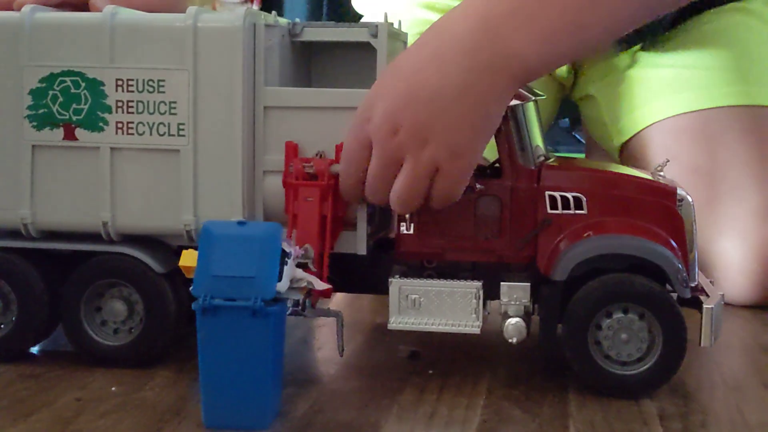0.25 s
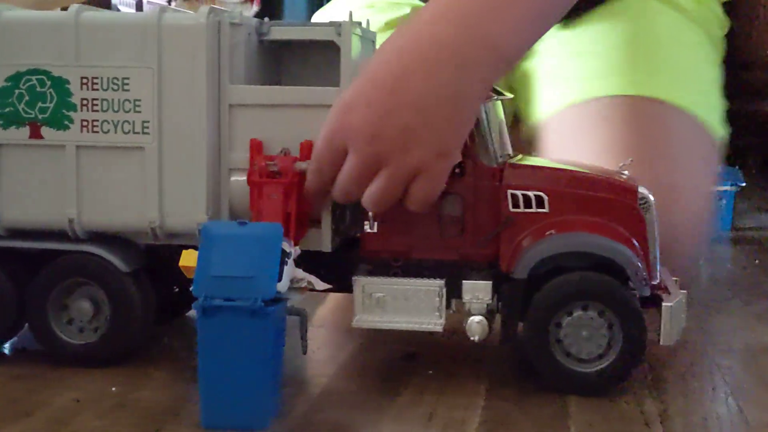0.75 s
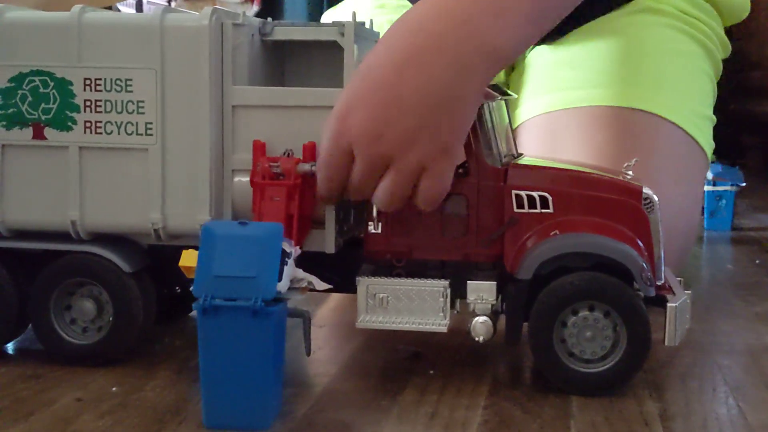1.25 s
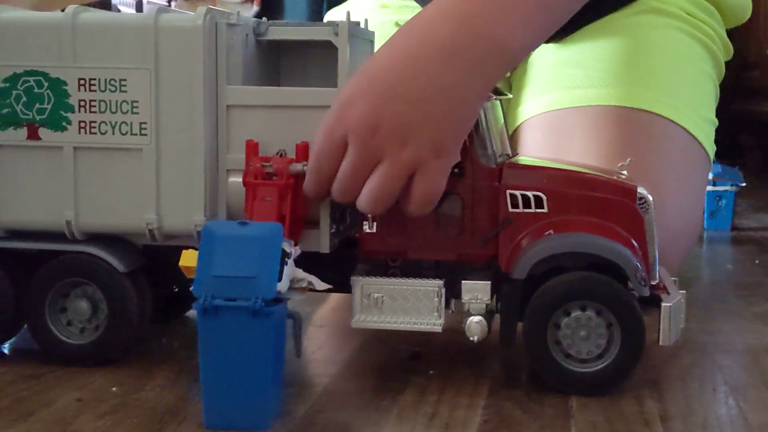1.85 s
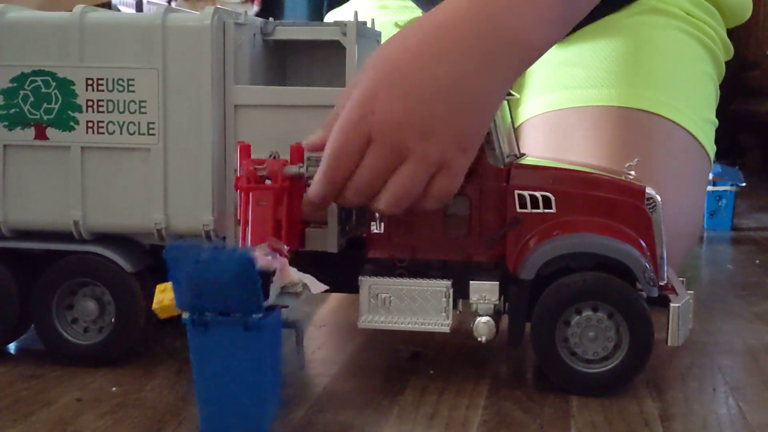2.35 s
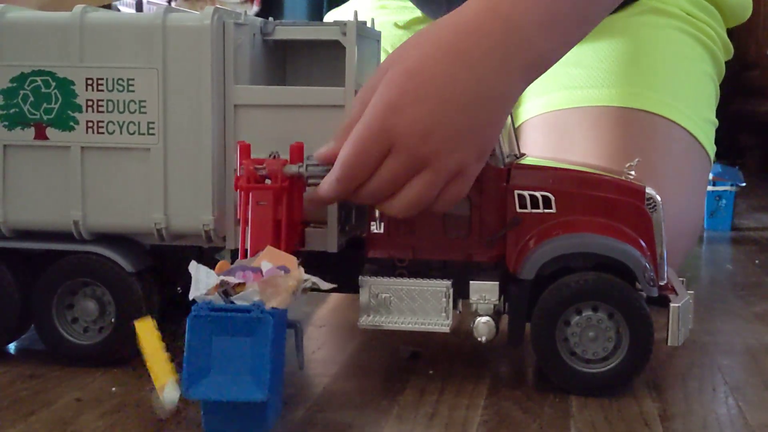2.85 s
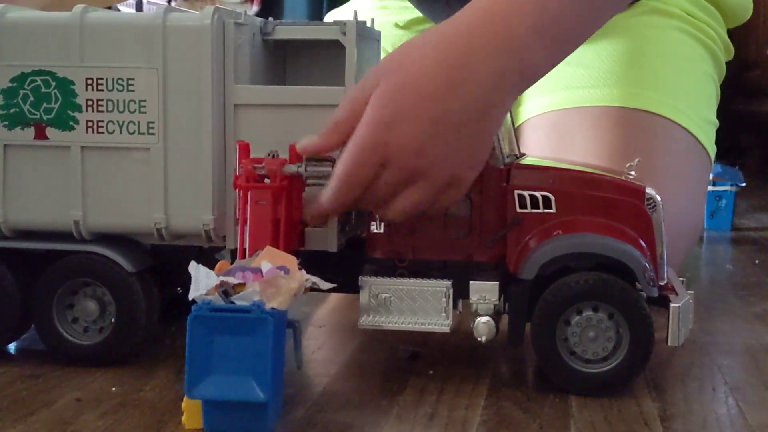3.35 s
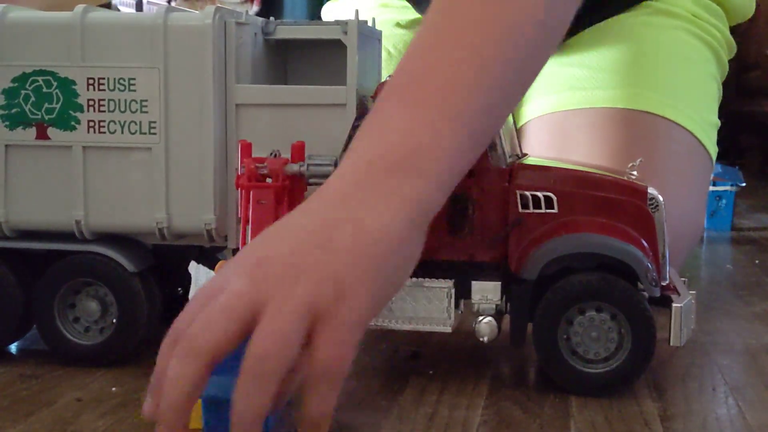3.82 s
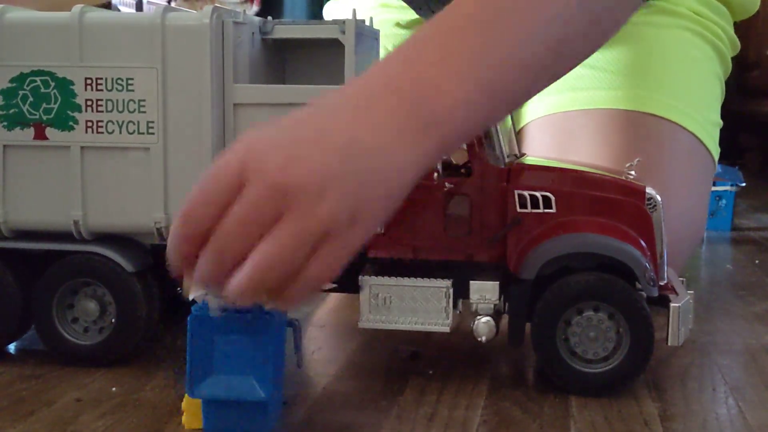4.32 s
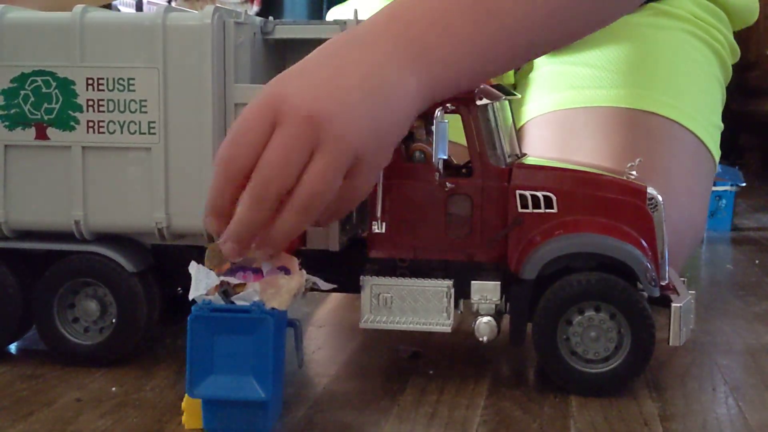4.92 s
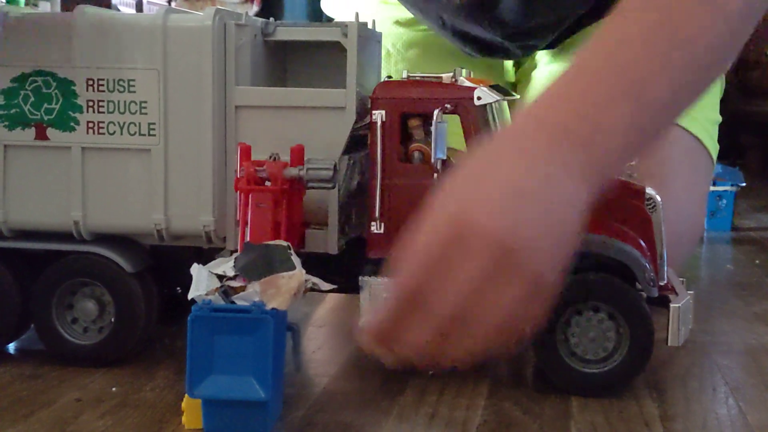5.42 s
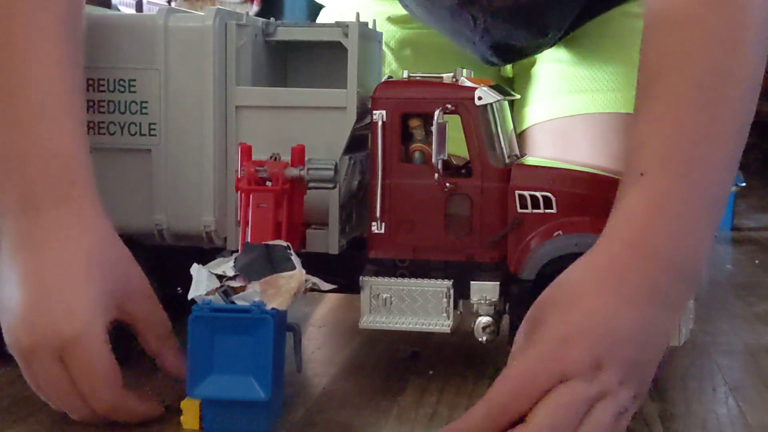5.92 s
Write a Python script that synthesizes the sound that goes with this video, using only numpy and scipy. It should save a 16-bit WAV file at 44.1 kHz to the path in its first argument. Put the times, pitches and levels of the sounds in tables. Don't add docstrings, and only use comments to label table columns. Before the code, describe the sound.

A close stereo pickup in a small quiet room, with soft hiss and low room air. Light hollow plastic clicks open the scene; from 0.5 to 1.1 seconds a cluster of clicks, scrapes and rattles mixes with dull, low thumps of knees and hands on wooden boards. After a near pause, a crisp lever clack lands at 1.55, small ticks follow around 2.0, and a stronger clack at 2.24. The bin tips with a bright hard knock at 2.56, drags and clicks, then its rim slams the floor at 2.88, the loudest moment. A hollow plastic brick hits at 3.01 and bounces rapidly until about 3.18, with bright short pings, and one last knock at 3.33. Quiet follows. At 4.0 to 4.3 a hand thumps softly and foil crackles crisply. Until 6 seconds only faint rustles, tiny ticks and gentle low board bumps remain.

```python
import sys
import numpy as np
from scipy import signal
from scipy.fft import rfft, irfft
from scipy.io import wavfile
from scipy.ndimage import uniform_filter1d

SR = 44100
rng = np.random.default_rng(int(sys.argv[2]) if len(sys.argv) > 2 else 0)


def ratio(d):
    e = np.asarray(d, float) / 20
    return 10 ** e


def to_wav(s):
    ch = np.atleast_2d(s).T
    pcm = np.round(np.clip(ch, -1, 1) * 32767)
    wavfile.write(sys.argv[1], SR, pcm.astype(np.int16))


N = 272538

# f/Hz, level per Hz/dB
AIR_SPECTRUM = [(30, -26), (70, -1), (145, -13), (240, -8), (330, -20), (550, -22.5), (800, -28),
                (1600, -28.5), (3600, -31), (9200, -30), (10500, -38), (16000, -41.5)]
# f/Hz, width/Hz, level above the air/dB
HOUSING_RINGS = [(1410, 200, 8), (2300, 150, 5), (3290, 200, 3), (5010, 400, 4), (7150, 250, 5),
                 (8050, 150, 12), (13800, 200, 4)]
AIR_DB, AIR_WAVER_DB, AIR_WAVER_S = -64.3, .8, .1

ROOM_T60_S, ROOM_DAMP, ROOM_DB = 0.33, 0.54, -14

PORT_LAG_S = 0.00013
SHELL_PAN_DB, EDGE_PAN_DB = 1.0, 6.0
LANDING_PAN_DB, BRICK_PAN_DB = -8.5, 2
PASS_TOP = 0.26
NOTCH_HZ, NOTCH_WIDTH_HZ = 10700, 1400

# f/Hz, width/Hz, level/dB
JOIST_MODES = [(82.6, 15, 1.5), (60, 6.6, -13), (115, 25.4, -2.5)]
# f/Hz, width/Hz, level/dB
BOARD_MODES = [(193.5, 28, -1), (260, 150, -9), (345, 59.4, -4.5), (515.4, 30, -11.5), (639, 21, -7),
               (930, 2900, -18.5)]
# f/Hz, width/Hz, level/dB
PLANK_MODES = [(189.7, 18.5, 5.5), (238, 47, -25)]
# f/Hz, width/Hz, level/dB
SHELL_MODES = [(829, 38, -3), (1180, 150, 0), (1920, 53, -4), (2430, 410, -2), (2900, 73, -3),
               (3250, 46, -2), (3470, 80, -4), (3680, 57, 0), (4210, 99, -2)]
# f/Hz, width/Hz, level/dB
EDGE_MODES = [(5000, 500, -6), (6400, 500, -5), (7100, 300, 0), (8100, 500, -9), (9150, 400, -7),
              (11800, 900, -18), (14200, 700, -22)]
# f/Hz, width/Hz, level/dB
RUB_MODES = [(820, 10, -7.5), (1320, 150, -10), (2150, 304, -1), (2242, 464, -2.5), (3044, 330, -7.5),
             (4226, 980, -14)]
# f/Hz, width/Hz, level/dB
BIN_DRAG_MODES = [(833, 20, 5.5), (644, 68, -1.5), (2402, 250, 0), (1500, 760, -9)]
# f/Hz, width/Hz, level/dB
BIN_MODES = [(832, 21, -9), (1500, 150, -6.5), (2150, 68, -6), (2448, 16, 1.5), (2900, 120, -10),
             (4150, 200, -5.5), (4700, 260, 4.5), (5010, 200, -0.5), (5700, 330, -10.5)]
# f/Hz, width/Hz, level/dB
RIM_MODES = [(700, 200, -7.5), (1210, 86, 3), (1470, 390, -9), (1940, 200, -4), (2370, 250, -4.5),
             (2690, 400, -2.5), (3257, 390, -1), (3638, 350, -4), (4240, 400, -4.5), (4700, 600, -9)]
# f/Hz, width/Hz, level/dB
BRICK_MODES = [(1290, 110, -8.5), (1970, 78, -12), (2420, 150, -14), (2900, 110, -2.5), (3280, 58, -6),
               (3680, 51, 3.5), (4060, 68, 2), (4730, 180, -16)]
# f/Hz, width/Hz, level/dB
FOIL_MODES = [(3040, 2870, -5.5), (5170, 1650, 0), (7100, 1200, -2.5), (8800, 854, 3.5), (10760, 1920, 10),
              (14280, 6300, 2.5)]

# t/s, length/s, deep level/dB, board level/dB
WEIGHT_SHIFTS = [(0.0, 0.042, -55.5, -49.5), (.15, 0.24, -72.5, -60.5), (.6, 0.045, -56, -41),
                 (.66, 0.018, -37, -34.5), (.78, 0.025, -46, -40), (.95, 0.17, -84, -54),
                 (1.4, 0.28, -83, -56), (2.05, 0.0078, -72, -58), (2.25, 0.096, -84, -45.5),
                 (2.55, 0.26, -64.5, -54.5), (2.9, 0.22, -55.5, -56), (4.01, 0.12, -52, -59.5),
                 (4.43, 0.11, -59.5, -102), (4.62, 0.15, -56.5, -68.5), (4.9, 0.089, -71.5, -67),
                 (5.1, 0.28, -61, -62.5), (5.6, 0.13, -62, -69.5)]
SHIFT_RISE_DB_S, SHIFT_FALL_DB_S = 262.5, 133.5
REST_DEEP_DB, REST_BOARD_DB = -70, -69
# t/s, length/s, level/dB
PLANK_HUM_EVENTS = [
    (1.53, 0.035, -53),
    (1.84, 0.056, -58.5),
    (2.05, 0.044, -53),
    (4.44, 0.073, -55),
    (5.33, .05, -48),
    (5.42, 0.2, -62.5),
]
# t/s, peak level/dB, ring f/Hz, t60/s
BOARD_THUMPS = [(0.029, -48, 172, 0.12), (0.56, -30.5, 427, 0.16), (0.604, -23, 219, 0.26),
                (0.651, -23, 500, 0.048), (0.76, -24.5, 201, 0.08), (0.955, -38, 670, 0.18),
                (1.059, -34, 201, 0.33), (1.096, -32.5, 514, 0.086), (1.538, -41, 193, 0.22),
                (1.646, -36, 306, 0.43), (1.652, -39.5, 550, 0.13), (1.841, -54, 185, 0.5),
                (2.055, -45, 300, 0.33), (2.232, -35, 473, 0.16), (2.291, -48, 190, 0.13),
                (2.36, -29, 343, 0.19), (2.546, -54, 534, 0.084), (2.886, -26.5, 345, 0.16),
                (3.021, -34, 237.5, 0.68), (3.329, -44.5, 199.2, 0.61), (3.333, -38.5, 629, 0.071),
                (4.009, -36, 80.4, 0.4), (3.995, -37, 304, 0.09), (4.006, -33, 198, 0.84),
                (4.104, -37, 232.7, 0.55), (5.326, -42, 700, 0.15), (4.62, -44.5, 248, 0.38),
                (4.92, -50, 266, 0.15), (5.14, -42, 217, 0.11), (5.293, -41, 210.4, 0.47),
                (5.321, -33.5, 205, 0.54), (5.623, -36.5, 483, 0.13), (5.651, -37.5, 144.7, 0.26),
                (5.842, -45, 146.3, 0.23)]
# t/s, length/s, shell level/dB, edge level/dB
PLASTIC_SLIDES = [(.6, 0.043, -47, -53), (.68, 0.065, -50.5, -54), (.79, 0.096, -52, -42.5),
                  (.9, 0.069, -52, -49.5), (1.53, 0.013, -44.5, -54), (1.985, 0.072, -52, -54.5),
                  (2.2, 0.045, -45, -47), (2.37, 0.072, -58, -54.5), (2.49, 0.074, -52.5, -52),
                  (2.6, 0.014, -52, -49.5), (2.68, .09, -56.5, -50.5), (2.8, 0.032, -55.5, -54),
                  (2.92, 0.039, -41.5, -53.5), (3.08, 0.057, -58.5, -51.5), (4.05, 0.062, -55.5, -65),
                  (4.11, 0.074, -56, -44), (4.46, .12, -88, -64), (5.14, 0.14, -64.5, -63),
                  (5.64, 0.082, -74, -61.5)]
SLIDE_RISE_DB_S, SLIDE_FALL_DB_S = 396, 451
# t/s, shell level/dB, edge level/dB
LOOSE_RATTLES = [(0.028, -42.5, -50.5), (0.499, -49, -48.5), (0.65, -30.5, -40), (0.771, -36, -41),
                 (0.906, -47, -40), (1.064, -47.5, -43.5), (1.098, -38.5, -37.5), (1.549, -34, -43),
                 (2.249, -26.5, -36), (2.286, -39.5, -32.5), (2.354, -41.5, -62), (2.561, -23.5, -25),
                 (2.668, -39.5, -48), (2.785, -34.5, -33), (2.887, -23.5, -53), (3.021, -30, -27.5),
                 (3.063, -26, -29), (3.149, -33.5, -29), (3.171, -44, -59), (3.333, -43.5, -56),
                 (3.518, -57.5, -73), (4.005, -49, -50.5), (4.248, -77, -44), (4.317, -61, -52.5),
                 (5.149, -60, -55), (5.197, -71, -66), (5.328, -52.5, -62), (5.439, -83, -57),
                 (5.584, -74, -49.5), (5.629, -48, -50), (5.942, -55.5, -51)]
RATTLE_RISE_DB_S, RATTLE_FALL_DB_S = 1799.5, 597
# t/s, length/s, level/dB
HOOK_DRAGS = [
    (2.5, 0.031, -47),
    (2.565, 0.0052, -34),
    (2.668, 0.011, -43),
    (2.72, 0.037, -45.5),
    (2.785, 0.019, -40.5),
]
# t/s, length/s, level/dB
FOIL_CRUMPLES = [
    (4.03, 0.035, -54.5),
    (4.09, 0.053, -35),
    (4.145, 0.053, -48),
    (4.2, 0.069, -45.5),
    (4.28, 0.0565, -57.5),
    (4.68, 0.14, -60),
    (5.42, 0.039, -56.5),
]
# t/s, length/s, level/dB
CHATTER_EVENTS = [
    (2.886, 0.004, -37.5),
    (3.016, 0.0056, -23.5),
    (3.03, 0.008, -30.5),
    (3.064, 0.014, -31),
    (3.1, 0.027, -54),
    (3.15, 0.016, -41),
]
# t/s, peak level/dB, f/Hz, swell/ms, t60/s
TAB_PINGS = [(2.691, -33, 7090, 1.5, 0.032), (2.665, -38.5, 3950, 1.8, 0.047),
             (2.666, -44.5, 7050, 1.2, 0.025), (2.974, -44, 5000, 2.0, 0.035),
             (2.99, -45.5, 8500, 1.3, .006), (3.061, -20.5, 7110, 1.0, 0.027),
             (3.073, -30, 4150, 1.5, 0.033), (3.147, -15.5, 7100, 2, 0.026),
             (3.149, -26.5, 6400, 2.2, .036), (4.183, -33, 9110, 0.35, 0.029),
             (4.22, -38, 8970, 0.54, .036)]

# t/s, shell peak level/dB, loudest ring f/Hz, edge level/dB
LEVER_CLICKS = [(0.015, -31, 1440, -68), (0.027, -27, 820, -53), (0.098, -35.5, 2380, -48),
                (0.495, -64, 7200, -42.5), (0.562, -62, 810, -51), (0.598, -56, 2880, -47),
                (0.62, -26.5, 2450, -56), (0.628, -24, 790, -37), (0.651, -21.5, 2900, -37),
                (0.72, -52, 820, -42.5), (0.77, -20, 2880, -37), (0.802, -27, 2050, -66),
                (0.903, -29, 1470, -48.5), (0.912, -30.5, 2020, -54), (0.936, -60, 8450, -44),
                (1.054, -36, 7100, -52), (1.1, -35, 7560, -32), (1.547, -12.5, 2150, -72),
                (1.559, -19, 2200, -55), (1.985, -36.5, 2180, -50), (2.043, -34.5, 1450, -61),
                (2.175, -45, 2150, -58), (2.239, -11.5, 2150, -24.5), (2.285, -23, 2150, -32),
                (2.351, -35.5, 2470, -60), (2.403, -32, 2310, -45)]
# t/s, shell peak level/dB, loudest ring f/Hz, edge level/dB
BIN_CLICKS = [
    (2.484, -42.5, 1679, -61.5),
    (2.51, -32, 2070, -66),
    (2.528, -25, 2180, -59),
    (2.557, -9, 6300, -20),
    (2.664, -25, 1903, -39),
    (2.693, -31, 832, -45.5),
    (2.739, -41.5, 8450, -39.5),
    (2.779, -30, 5010, -32.5),
    (2.805, -18.5, 2420, -41.5),
]
# t/s, shell peak level/dB, loudest ring f/Hz, edge level/dB
RIM_HITS = [
    (2.8826, 1.5, 3280, -22),
]
# t/s, shell peak level/dB, loudest ring f/Hz, edge level/dB
BRICK_HITS = [(3.0145, -4, 6700, -11.5), (3.028, -11, 3680, -9.5), (3.061, -15, 3726, -19.5),
              (3.073, -18, 3855, -20.5), (3.094, -21.5, 2800, -48.5), (3.115, -15, 2900, -35),
              (3.122, -19, 3500, -37), (3.134, -20, 2390, -39), (3.149, -31, 9200, -25),
              (3.17, -49, 3220, -33.5), (3.175, -24, 3980, -60), (3.33, -20.5, 2166, -70)]
# t/s, shell peak level/dB, loudest ring f/Hz, edge level/dB
SCRAP_TICKS = [(3.993, -37, 1120, -76), (4.009, -34, 1080, -70), (4.028, -48, 1026, -59.5),
               (4.09, -60, 6140, -52), (4.104, -30, 1240, -40), (4.129, -39, 7900, -34.5),
               (4.154, -45, 7100, -42), (4.183, -55, 9200, -34), (4.189, -65, 9100, -29.5),
               (4.222, -55, 8000, -35), (4.243, -52, 7400, -30), (4.256, -45, 6000, -34),
               (4.688, -48, 1420, -49), (4.743, -48.5, 1402, -45.5), (4.876, -51, 7120, -51.5),
               (5.137, -39.5, 802, -52), (5.194, -59, 4880, -45.5), (5.225, -41, 1310, -77),
               (5.325, -46, 1200, -80), (5.428, -65.5, 9400, -49.5), (5.581, -63, 7240, -48),
               (5.621, -37.5, 824, -42), (5.633, -50, 1160, -67), (5.69, -70, 7200, -51),
               (5.829, -48, 3600, -55), (5.928, -64.5, 6950, -46.5), (5.942, -66, 6960, -48.5)]

# chatter/ms, rise/ms, lift above 10 kHz/dB, lift of its own ring/dB
LEVER_FEEL = (2.0, .6, 4, 4)
# same columns, in ms, ms, dB, dB
BIN_FEEL = (3.0, .3, 0, 0)
# same columns, in ms, ms, dB, dB
RIM_FEEL = (1.2, .1, -8, -4)
# same columns, in ms, ms, dB, dB
BRICK_FEEL = (1.3, .2, 10, -4)
# same columns, in ms, ms, dB, dB
SCRAP_FEEL = (1.3, .25, 18, -2)


def band(x, hz, width):
    return signal.lfilter(*signal.iirpeak(hz, hz / width, fs=SR), x)


def ring(x, modes):
    y = sum((-1) ** k * ratio(db) * band(x, hz, width) for k, (hz, width, db) in enumerate(modes))
    return y / np.std(y)


def butter(x, order, hz, kind="low"):
    return signal.sosfilt(signal.butter(order, hz, kind, fs=SR, output="sos"), x)


def pan(db):
    return ratio(np.array([[db], [-db]]) / 2)


def grit(rate, spread_db):
    when, sign, size = rng.random((3, N))
    return (when < rate / SR) * np.sign(sign - .5) * ratio(-spread_db * np.log(size + .008))


def ports(x, apart, unlike):
    right = np.sqrt(1 - unlike) * x + np.sqrt(unlike) * apart
    n = np.arange(len(x))
    return np.array([x, np.interp(n - PORT_LAG_S * SR, n, right)])


def rubbed(modes, rate, unlike):
    return ports(ring(grit(rate, 3.5), modes), ring(grit(rate, 3.5), modes), unlike)


def swells(rows, rise_db_s, fall_db_s):
    t = np.arange(0, N + 20, 20) / SR
    start, length, *levels = np.transpose(rows)[:, :, None]
    fade = -rise_db_s * np.maximum(start - t, 0) - fall_db_s * np.maximum(t - start - length, 0)
    gains = [np.sqrt((ratio(db + fade) ** 2).sum(axis=0)) for db in levels]
    return [np.interp(np.arange(N) / SR, t, gain) for gain in gains]


def add(out, x, s):
    i = int(s * SR)
    out[:, i:i + x.shape[1]] += x[:, :N - i]


def struck(modes, t, chance, scatter_db, turn):
    hz, width, db = np.transpose(modes)[:, :, None]
    detune, twist, scatter = chance[:len(modes)].T[:, :, None]
    phase = 2 * np.pi * hz * (1 + detune / 80) * t
    late = 2 * np.pi * hz * PORT_LAG_S + turn * twist * np.minimum(hz / 2500, 1)
    size = ratio(db + scatter_db * scatter) * np.sqrt(width) * np.exp(-np.pi * width * t)
    return np.array([(size * np.sin(phase)).sum(axis=0), (size * np.sin(phase - late)).sum(axis=0)])


def waver():
    k = int(AIR_WAVER_S * SR)
    x = uniform_filter1d(uniform_filter1d(rng.standard_normal(N), k), k)
    return ratio(AIR_WAVER_DB * x / np.std(x))


def air():
    hz = np.arange(N // 2 + 1) * SR / N + 1
    air_hz, air_db = np.transpose(AIR_SPECTRUM)
    db = np.interp(np.log(hz), np.log(air_hz), air_db)
    db = db + sum(lift / (1 + (2 * (hz - f) / width) ** 2) for f, width, lift in HOUSING_RINGS)
    like = 0.87 / (1 + (hz / 450) ** 2)
    mid, side = rfft(rng.standard_normal((2, N)))
    both = np.sqrt(1 + like) * mid + np.sqrt(1 - like) * side * np.array([[1], [-1]])
    x = irfft(ratio(db) * both, N)
    bass = butter(x, 1, 900)
    return (bass * waver() + (x - bass) * waver()) / np.std(x) * ratio(AIR_DB)


def room(x, split_hz=4500):
    t = np.arange(20000) / SR
    noise = rng.standard_normal((2, len(t)))
    low = butter(noise, 2, split_hz)
    low_tail = low * ratio(-60 * t / ROOM_T60_S)
    high_tail = (noise - low) * ratio(-60 * t / ROOM_T60_S / ROOM_DAMP)
    tail = (low_tail + high_tail) * np.clip(t / .012 - .4, 0, 1)
    return signal.fftconvolve(tail / np.sqrt((tail ** 2).sum() / 2), x[None])[:, :N]


def shuffle():
    deep_gain, board_gain = swells(WEIGHT_SHIFTS, SHIFT_RISE_DB_S, SHIFT_FALL_DB_S)
    bumps = [butter(grit(1200, 2.2), 2, 800) for _ in range(4)]
    deep = ports(ring(bumps[0], JOIST_MODES), ring(bumps[1], JOIST_MODES), unlike=0.013)
    board = ports(ring(bumps[2], BOARD_MODES), ring(bumps[3], BOARD_MODES), unlike=0.07)
    return deep * (deep_gain + ratio(REST_DEEP_DB)) + board * (board_gain + ratio(REST_BOARD_DB))


def plank():
    hum = ring(ring(grit(600, 2.5), PLANK_MODES), [(200, 120, 0)])
    return ports(hum, hum, unlike=0) * swells(PLANK_HUM_EVENTS, 430, 243)[0]


def thumps(push_ms=6.06, bright_hz=700):
    out, t = np.zeros((2, N)), np.arange(12000) / SR
    for s, db, hz, t60 in BOARD_THUMPS:
        width = np.log(1000) / np.pi / t60
        modes = [(hz, width, -1.0), (hz * 0.96, 1.56 * width, -4.0), (hz * 1.3, 1.8 * width, -4.0)]
        modes += [(950, 400, -10.0 + 0.67 * (db + 30))]
        modes += [(f, max(w, width), level - 4.0) for f, w, level in BOARD_MODES]
        boards = struck(modes, t, rng.standard_normal((10, 3)), scatter_db=3.0, turn=.1)
        settle_ms = np.clip(push_ms * 180 / hz, 1.5, 9)
        press = (t * np.exp(-t * 1000 / settle_ms))[:2500]
        push = press * rng.standard_normal(len(press))
        push = butter(push, 2, min(bright_hz, 2 * hz))
        push = butter(push, 2, min(hz, 200) * .6, "high")
        x = signal.fftconvolve(boards, push[None])[:, :len(t)]
        add(out, x / np.abs(x).max() * ratio(db), s)
    return out


def scrapes():
    edge = [(hz, (1.8 if hz > 1e4 else 2.1) * w, db + 15.9 * (hz > 1e4)) for hz, w, db in EDGE_MODES]
    slid = swells(PLASTIC_SLIDES, SLIDE_RISE_DB_S, SLIDE_FALL_DB_S)
    knocks = [(s, 0, shell_db, edge_db) for s, shell_db, edge_db in LOOSE_RATTLES]
    shaken = swells(knocks, RATTLE_RISE_DB_S, RATTLE_FALL_DB_S)
    shell_rub = rubbed(RUB_MODES, 5000, unlike=.3) * np.hypot(slid[0], shaken[0])
    edge_rub = rubbed(edge, 5000, unlike=.3) * np.hypot(slid[1], shaken[1])
    return shell_rub * pan(SHELL_PAN_DB) + edge_rub * pan(EDGE_PAN_DB)


def drags():
    return rubbed(BIN_DRAG_MODES, 2500, unlike=.2) * swells(HOOK_DRAGS, 700, 460)[0]


def crumple():
    return rubbed(FOIL_MODES, 3500, unlike=.3) * swells(FOIL_CRUMPLES, 1200, 1600)[0] * pan(5)


def chatter():
    return rubbed(BRICK_MODES, 3000, unlike=.3) * swells(CHATTER_EVENTS, 3300, 500)[0] * pan(4)


def pings():
    out, t = np.zeros((2, N)), np.arange(2500) / SR
    for s, db, hz, swell_ms, t60 in TAB_PINGS:
        shape = (1 - np.exp(-t * 1000 / swell_ms)) ** 2 * np.exp(-np.log(1000) * t / t60)
        rough = 1 + .3 * ring(rng.standard_normal(len(t)), [(300, 400, 0)])
        x = shape * rough * np.sin(2 * np.pi * hz * (t - np.array([[0], [PORT_LAG_S]])))
        add(out, x / np.abs(x).max() * ratio(db + 3.0) * pan(EDGE_PAN_DB), s)
    return out


def contact_push(t, chatter_ms, rise_ms):
    noise = rng.standard_normal(len(t))
    fall = np.exp(-t * 1000 / chatter_ms) + ratio(-22) * np.exp(-t * 1000 / 16)
    push = noise * np.abs(noise) * fall * (1 - np.exp(-t * 1000 / rise_ms))
    push[0] = 6 * np.exp(-rise_ms / .4)
    return push


def clicks(rows, feel, body, place_db=0, own_db=11.0, edge_lift_db=9, tilt_db=-2.5, hardness=0.17):
    out, t = np.zeros((2, N)), np.arange(3000) / SR
    chatter_ms, rise_ms, top_db, ring_db = feel
    for s, shell_db, hz, edge_db in rows:
        push = contact_push(t, chatter_ms, rise_ms)
        slope = tilt_db + hardness * np.clip(edge_db - shell_db + 21.5, -20, 20)
        shell = [(f, w, db + slope * np.log2(f / 2000)) for f, w, db in body]
        edge = [(f, w, db + top_db * (f > 1e4)) for f, w, db in EDGE_MODES]
        off_panel = hz < 1600 or 4500 < hz < 6000
        own = (hz, 110 + hz / 30, own_db + ring_db - 6 * off_panel)
        (shell if hz < 4500 else edge).append(own)
        hollow = (shell, shell_db, SHELL_PAN_DB + place_db)
        thin = (edge, edge_db + edge_lift_db, EDGE_PAN_DB)
        for modes, db, pan_db in (hollow, thin):
            body_ring = struck(modes, t, rng.standard_normal((16, 3)), scatter_db=2.5, turn=.6)
            x = signal.fftconvolve(body_ring, push[None])[:, :len(t)]
            add(out, x / np.abs(x).max() * ratio(db) * pan(pan_db), s)
    return out


def damped(modes, extra_hz):
    return [(hz, width + extra_hz, db) for hz, width, db in modes]


def scraps():
    return clicks(SCRAP_TICKS, SCRAP_FEEL, damped(SHELL_MODES, 200))


def brick():
    return clicks(BRICK_HITS, BRICK_FEEL, damped(BRICK_MODES, 160), BRICK_PAN_DB)


def bin_and_rim():
    return clicks(BIN_CLICKS, BIN_FEEL, BIN_MODES, 2.5) + clicks(RIM_HITS, RIM_FEEL, RIM_MODES, LANDING_PAN_DB)


def lever():
    return clicks(LEVER_CLICKS, LEVER_FEEL, damped(SHELL_MODES, 200))


def scene():
    low = shuffle() + plank() + thumps()
    hard = butter(scraps() + brick() + bin_and_rim() + lever(), 6, 14500)
    toys = hard + scrapes() + drags() + crumple() + chatter() + pings()
    toys = butter(toys, 3, 650, "high")
    dull = butter(toys + ratio(ROOM_DB) * room(toys[0]), 4, 9800)
    heard = dull + PASS_TOP * np.array([[.55], [1.45]]) * (toys - dull)
    return heard - 0.6 * band(heard, NOTCH_HZ, NOTCH_WIDTH_HZ) + low + air()


def roll_off(x):
    return signal.sosfilt(signal.butter(12, 15950, fs=SR, output="sos"), x)


def record(dry):
    x = butter(dry, 5, 48, "high")
    x = butter(x, 6, 15300)
    x = .97 * np.tanh(x / .97)
    return roll_off(x)


dry = scene()
out = record(dry)
to_wav(out)
```